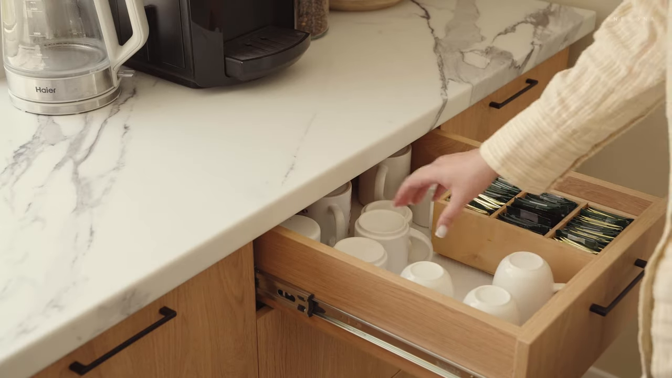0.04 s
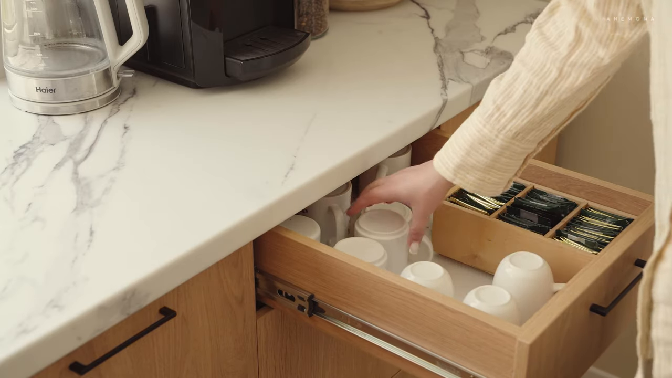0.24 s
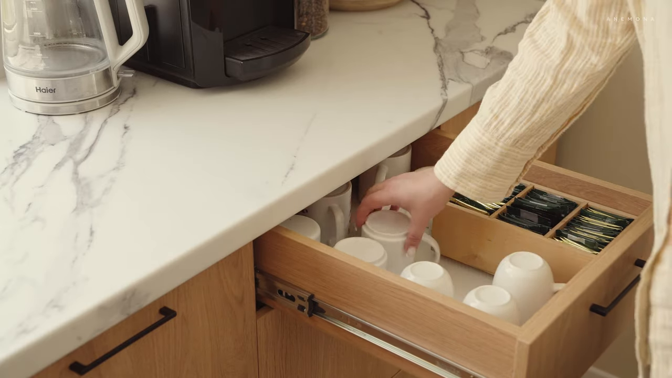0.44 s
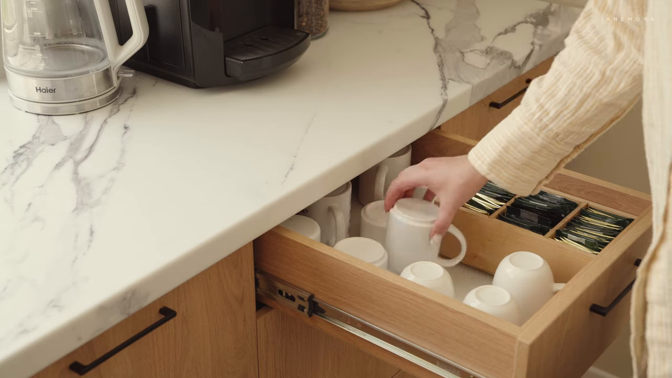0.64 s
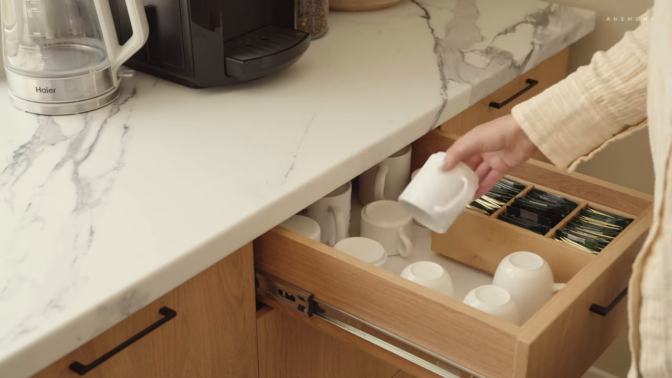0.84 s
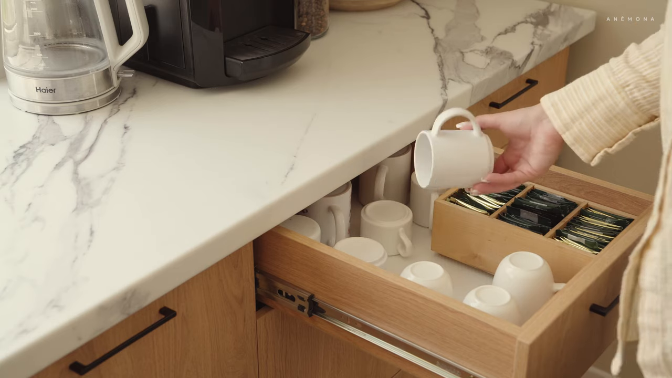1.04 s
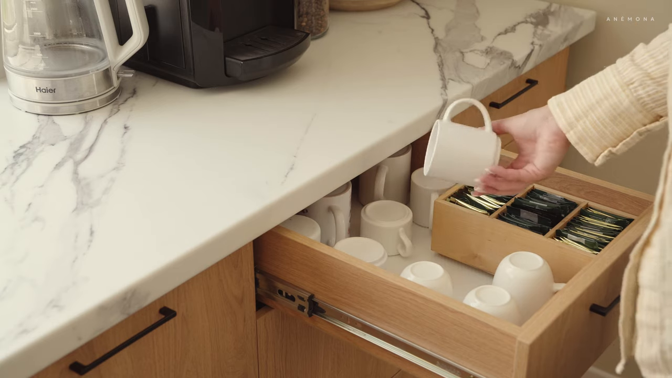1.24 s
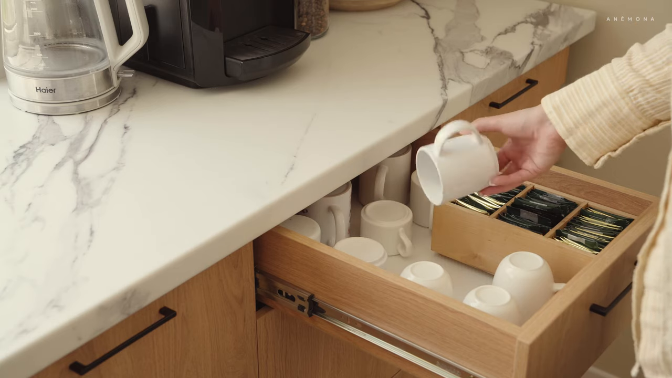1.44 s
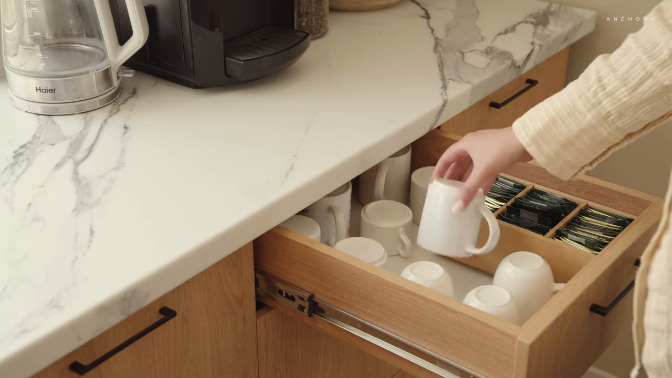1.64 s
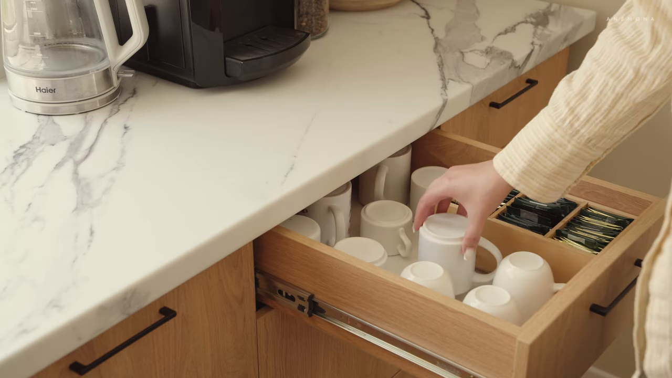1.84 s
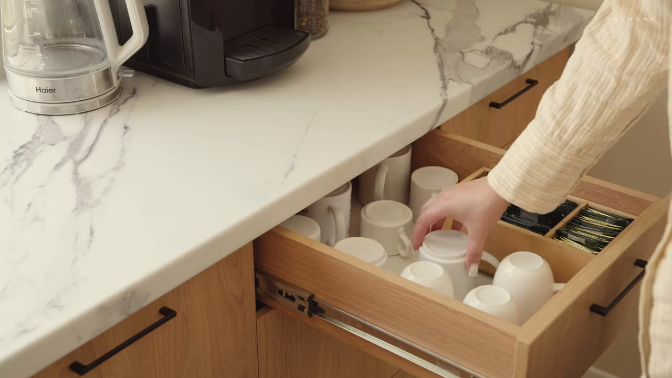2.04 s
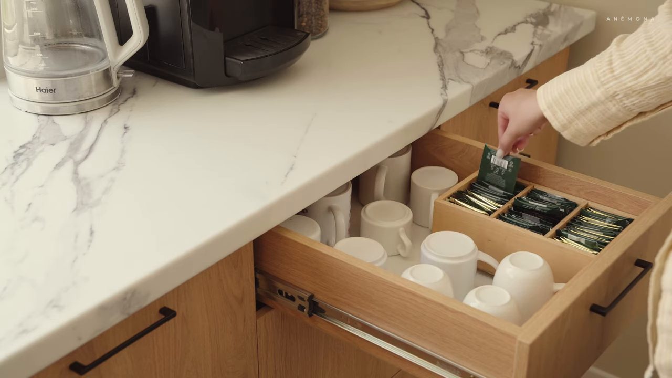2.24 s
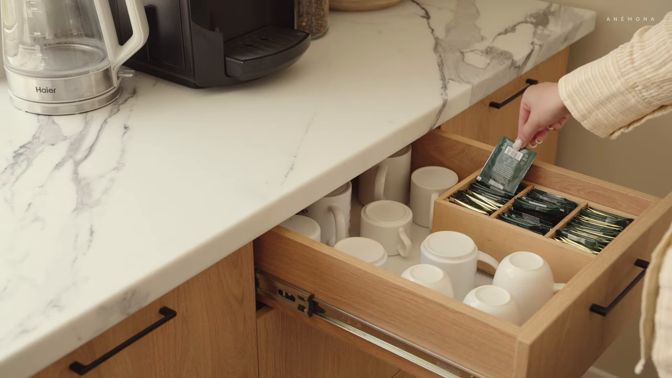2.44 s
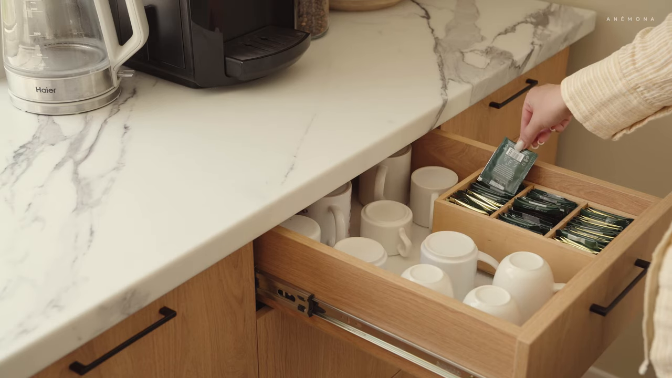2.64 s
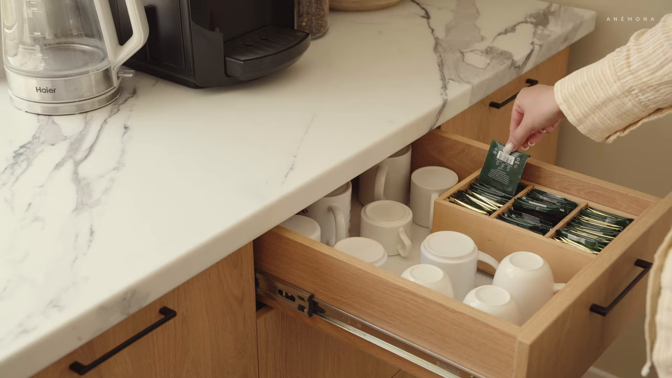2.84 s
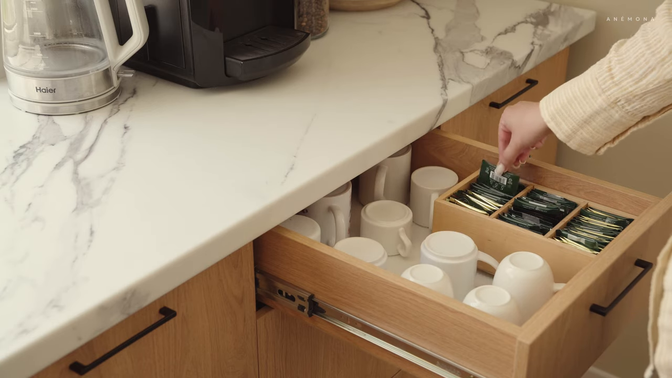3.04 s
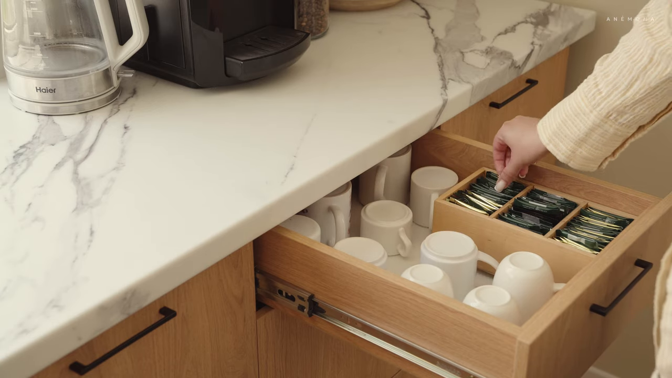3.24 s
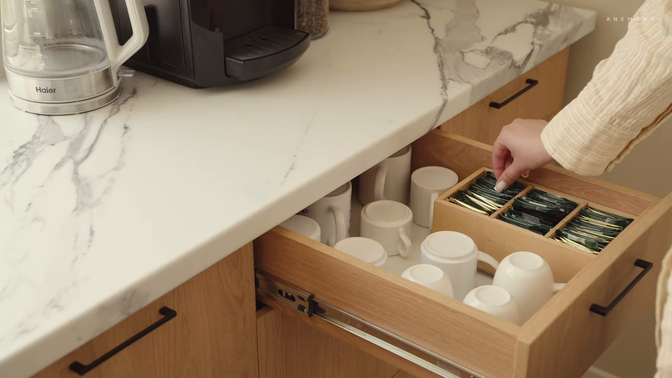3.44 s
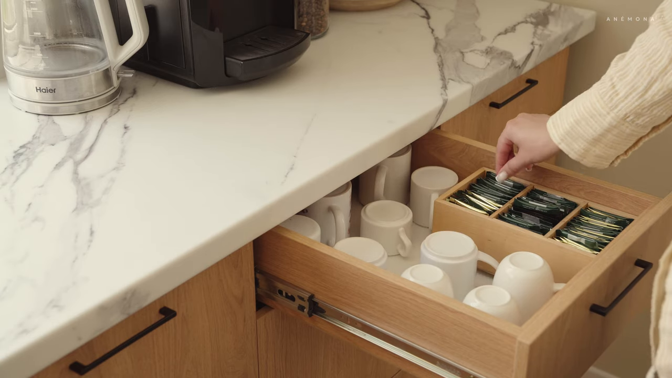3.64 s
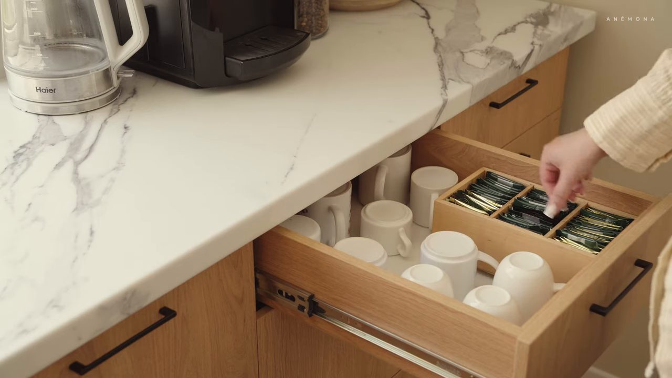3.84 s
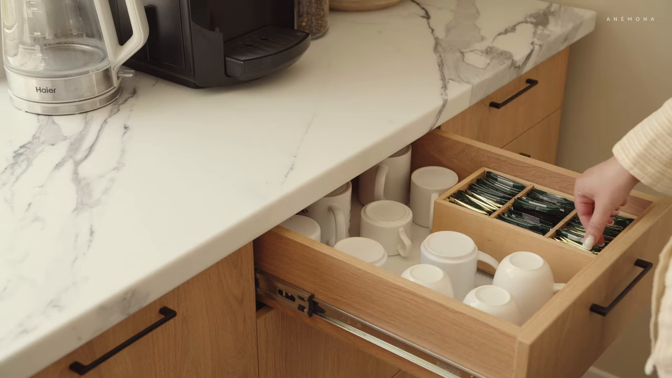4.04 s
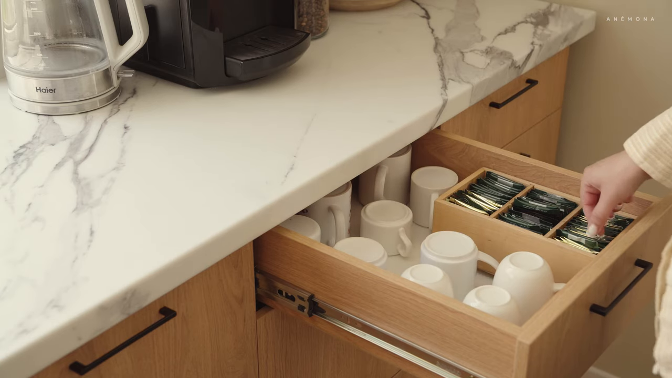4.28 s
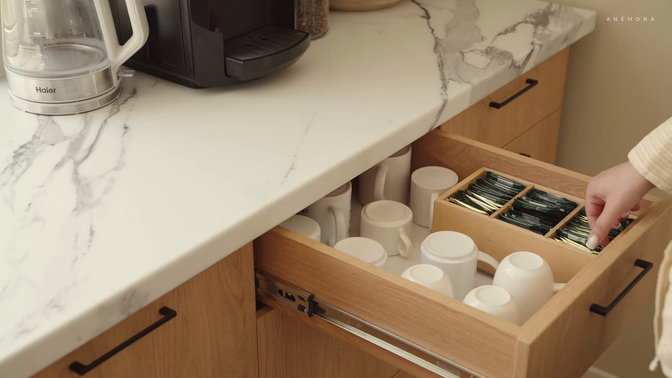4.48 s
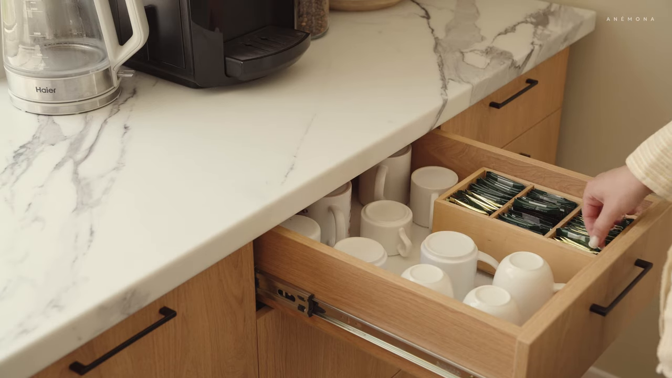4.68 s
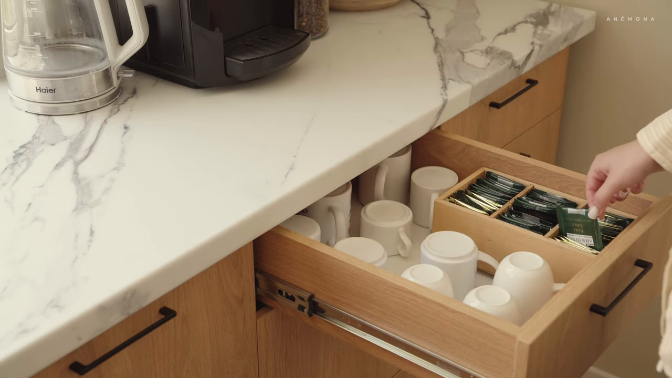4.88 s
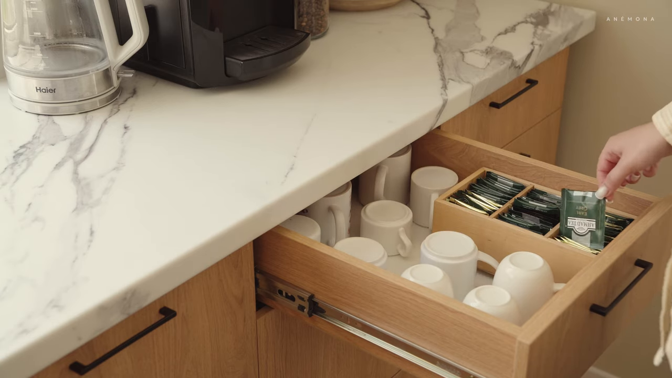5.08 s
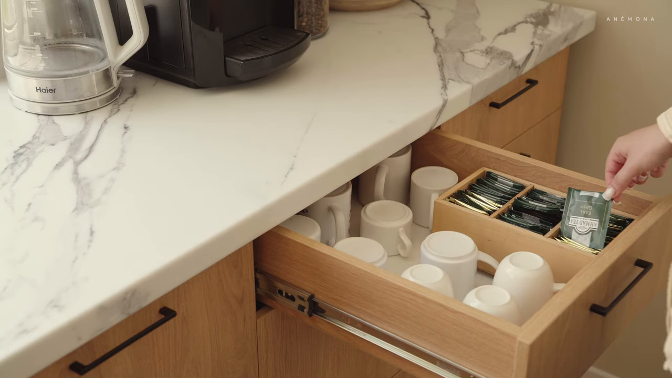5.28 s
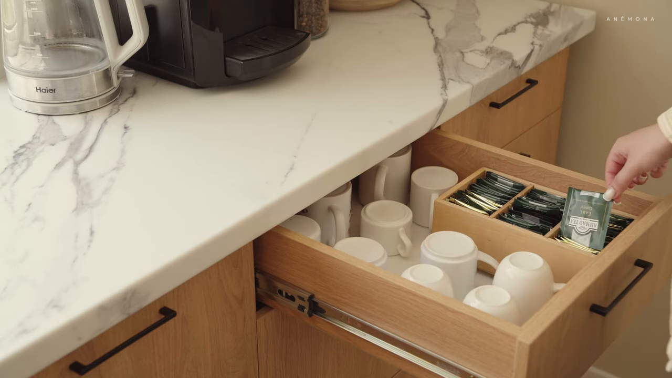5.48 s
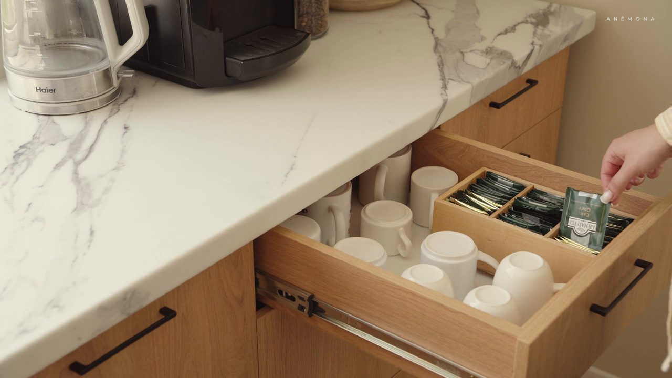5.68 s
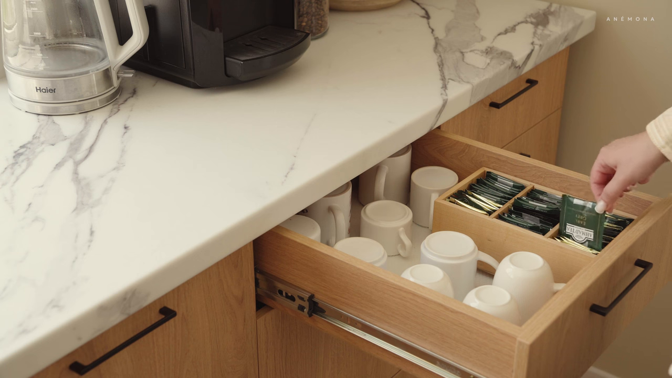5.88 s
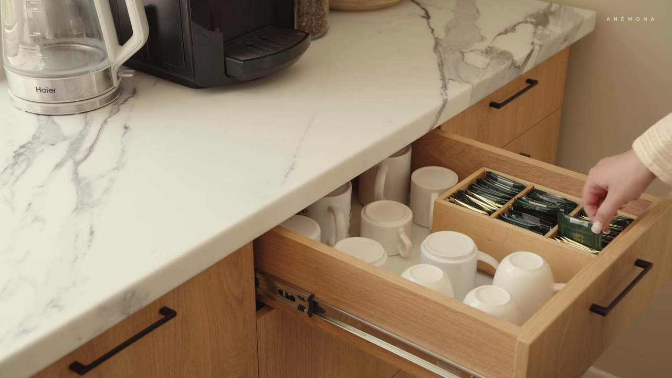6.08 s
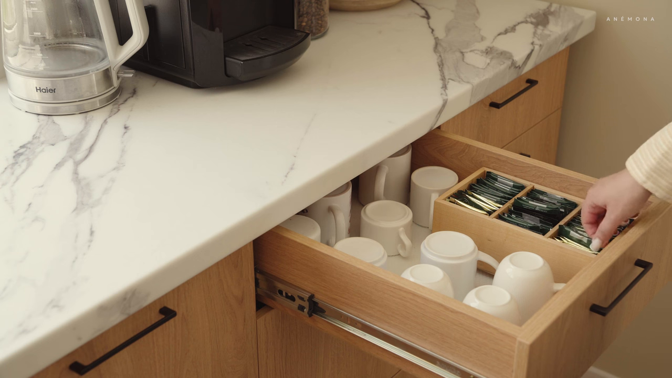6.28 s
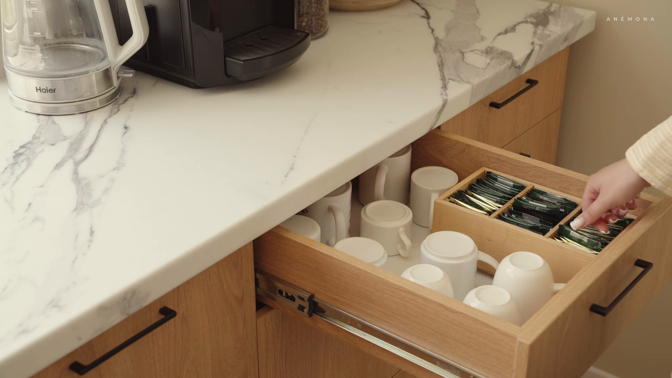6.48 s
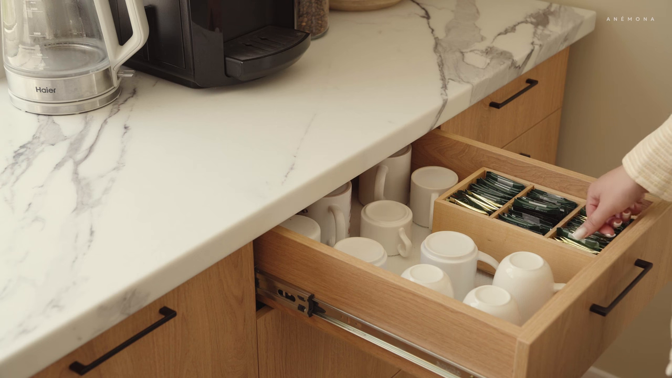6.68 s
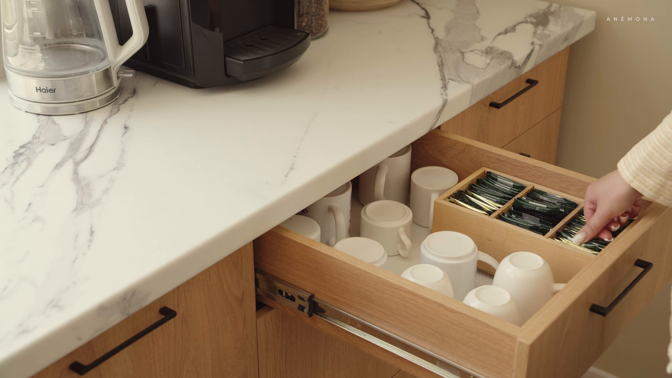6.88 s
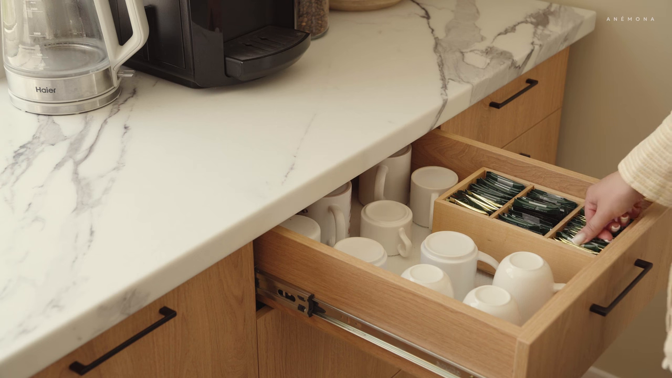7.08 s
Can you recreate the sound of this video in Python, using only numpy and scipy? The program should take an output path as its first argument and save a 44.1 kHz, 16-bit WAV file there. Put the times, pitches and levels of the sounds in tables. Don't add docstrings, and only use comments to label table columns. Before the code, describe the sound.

Quiet kitchen air with a low hum, heard close in stereo beside an open wooden drawer. Around 0.55 s a ceramic cup drags loose with a short scrape and a dull thump; a barely audible brush follows near 0.9. At 1.87 bright ceramic clinks ring out with rapid rebounds, a short clatter and soft wooden thuds. From 2.18 to 2.26 several quick dull knocks settle the cup, then the ring is cut short. At 2.35 a foil tea sachet snaps and rustles; crisp snaps and a steady slide run from 2.8 to 3.4, with a slight hollow ring, fading by 3.7. Faint shifts come at 4.2 and 4.6. A dense crumpling burst fills 4.8 to 5.2, then a light tick and soft gliding hiss near 5.9. At 6.05 another snap and firm rustle lead to a faint low box groan at 6.4, a dull snap, and small settling crackles near 6.9.

```python
import sys
import numpy as np
from scipy import signal
from scipy.fft import rfft, irfft
from scipy.io import wavfile
from scipy.ndimage import uniform_filter1d

SR = 44100
rng = np.random.default_rng(int(sys.argv[2]) if len(sys.argv) > 2 else 0)


def invert_db(level):
    return 10 ** (np.asarray(level, dtype=float) / 20)


def log_audio(samples):
    frames = np.atleast_2d(samples).T
    limited = np.clip(frames, -1, 1)
    pcm = np.round(limited * 32767).astype(np.int16)
    wavfile.write(sys.argv[1], SR, pcm)


N = 313627
TIME = np.arange(N) / SR
CHANGE_S = 2.267

# (frequency [Hz], density [dB per Hz])
AIR_COLOUR = [(15, -12), (30, -9), (60, -12), (110, -12), (200, -7), (400, -14), (800, -19), (1600, -24),
              (3200, -27.5), (6400, -31), (12000, -35), (16000, -38)]
AIR_DB = -53.5
# (frequency [Hz], width [Hz], lift [dB])
ROOM_HUMS = [(116, 7.5, 1), (205, 9.9, 18), (259, 8.1, 3.9), (367.34, 4.6, 10.6), (450, 14, 4.4),
             (672, 9.6, 10.8)]
# (frequency [Hz], likeness [0-1])
CAPSULE_LIKENESS = [(30, 0.96), (200, 0.87), (550, 0.26), (1650, 0.08), (5000, 0.05), (15000, 0.082)]

CUP_MODES_HZ = [1620, 1845, 1949, 2138, 2159, 2248, 2374, 2555, 2643, 2692, 2805, 3705, 4506, 4791, 5909,
                5931, 6347, 6955, 7160, 7634, 9905, 10290, 10390, 11030, 11370, 11980, 12390, 12570, 13060,
                15350]
# (level [dB], t60 [s])
CUP_MODE_RING = [(-18, 0.14), (-17, 0.24), (-32, 0.21), (-15, 0.65), (-6, 0.29), (-7.5, 0.28), (-30, .3),
                 (-2, 0.61), (-10, 0.12), (-28, 0.36), (-20, 0.49), (-47, .3), (-24.5, 0.37), (-20.5, 0.19),
                 (-10.5, 0.26), (-4, 0.14), (-36, 0.23), (-28, 0.4), (-20, 0.66), (-29, 0.76), (-21, 0.25),
                 (-23, 0.24), (-34, 0.2), (-30, .22), (-27, 0.31), (-30, 0.5), (-38, .2), (-25, 0.24),
                 (-16, 0.2), (-20, .25)]
# (time [s], level [dB], hardness as cut-off [Hz])
CLINKS = [
    (1.8721, -23.5, 11900),
    (1.8825, -33.5, 3920),
    (1.898, -30, 14000),
    (2.1848, -44.5, 2500),
]
# (frequency [Hz], density [dB per Hz])
CLATTER_COLOUR = [(100, -19), (300, -6.5), (600, -0.5), (850, -3), (1300, -6.5), (1700, -14.5), (2300, -4),
                  (2900, -19), (3400, -33), (5300, -33), (7300, -14.5), (8700, -50), (10000, -25),
                  (13300, -33), (14600, -45)]
CLATTER_DB, CLATTER_T60_S = 1.5, 0.15

# (frequency [Hz], level [dB], t60 [s])
DRAWER_MODES = [(136, -9.5, 0.26), (202.6, -4.5, 0.38), (278, 3.5, 0.12), (350, -4, 0.077),
                (412, -6.5, 0.062), (500, -0.5, 0.025), (580, -6.5, 0.11), (735, -9.5, 0.05),
                (970, -3.5, 0.021), (1220, -5.5, 0.034), (1520, -6, .02), (1900, -9, 0.021),
                (2830, -12, .06)]
# (time [s], level [dB], hardness as cut-off [Hz])
KNOCKS = [(.561, -36, 800), (.575, -31.5, 178), (1.874, -34.5, 910), (1.9, -37.5, 900), (1.925, -26.5, 170),
          (2.184, -25.5, 960), (2.199, -25, 706), (2.213, -37, 450), (2.228, -34, 600),
          (2.235, -27.5, 1040), (2.2425, -41, 500), (2.255, -44, 405)]
# (time at full force [s], hold [s], level [dB], rise [dB/s], fall [dB/s])
SCRAPES = [
    (.54, 0.0061, -34.5, 200, 118),
    (.93, .005, -56, 600, 694),
]

# (time [s], level [dB], treble against it [dB], panel ring [Hz])
SNAPS = [(2.3545, -27, -31, 3540), (2.538, -42.5, 2, 2790), (2.897, -32, 8.5, 2000), (2.975, -32, 4, 2090),
         (3.131, -34, 11, 3020), (3.189, -36, -5, 1600), (3.3237, -34, 10, 2430), (3.651, -47.5, -5, 9100),
         (3.68, -46, -8, 11100), (4.144, -50.5, -9, 2390), (4.6, -52.5, -9, 2100), (5.187, -39.5, 0, 4970),
         (5.193, -58, -13, 3000), (5.363, -48, -14, 3830), (6.046, -28, 8, 2840), (6.444, -36, -22, 2490)]
SNAP_WIDTH, SNAP_CRACKLE_S, HALVING_DB = 1.61, 0.0094, 19
# (time [s], level [dB], panel ring [Hz], crackle [s])
CRUMPLES = [(2.358, -28, 5900, 0.0062), (2.774, -51, 1500, .011), (2.93, -40, 3200, 0.024),
            (3.0, -45, 2060, .014), (3.386, -36, 1870, 0.0045), (3.535, -55, 4030, .0075),
            (3.64, -47.5, 2120, 0.019), (4.23, -66, 2000, 0.036), (4.654, -58, 1900, 0.012),
            (4.877, -41, 2080, 0.049), (4.917, -34.5, 2830, 0.016), (4.965, -32.5, 3770, 0.024),
            (4.987, -37, 3950, .008), (5.1275, -32, 1370, .016), (5.16, -58, 1800, .017),
            (6.266, -40.5, 2000, 0.021), (6.308, -46.5, 2330, 0.021), (6.38, -48, 2260, .0086),
            (6.87, -50, 3380, 0.029)]
# (time [s], level [dB], panel ring [Hz], crackle [s])
CRINKLES = [(3.15, -39, 5000, 0.0065), (3.388, -45.5, 5130, 0.012), (3.69, -60, 12500, 0.037),
            (4.18, -58, 3500, .008), (4.288, -54, 2500, 0.02), (4.7, -53, 7500, .006),
            (4.816, -35.5, 1780, 0.0067), (4.934, -32.5, 2830, 0.018), (5.039, -31, 3960, .011),
            (6.051, -37.5, 2570, 0.018), (6.197, -39, 2830, 0.0094), (6.96, -49, 2920, .02)]
# (time [s], level [dB], panel ring [Hz], crackle [s])
BOX_TAPS = [
    (2.356, -36.5, 790, 0.027),
    (5.041, -36, 580, 0.013),
    (6.88, -46, 617, 0.02),
]
# (treble [dB], ring width [Hz])
SLACK_COLOUR = (-13, 1700)
# (treble [dB], ring width [Hz])
TAUT_COLOUR = (-1, 3400)
# (treble [dB], ring width [Hz])
WOODEN_COLOUR = (-28, 700)

# (time at full force [s], hold [s], level [dB], rise [dB/s], fall [dB/s])
STROKES = [
    (2.39, 0.012, -41.5, 58, 131),
    (3.05, 0.28, -48.5, 43, 102),
    (3.57, 0.096, -54.5, 90, 240),
    (4.2, 0.052, -58, 102, 57),
    (4.65, 0.075, -64, 104, 45),
    (4.88, 0.18, -42.5, 120, 72),
    (6.04, 0.18, -45.5, 71, 56),
    (6.95, .2, -58, 25, 30),
]
# (frequency [Hz], width [Hz], level [dB])
BOX_MODES = [(527, 130, 5), (630, 58, 5), (860, 720, 1.5), (1995, 170, -6)]
FIZZ_DB, FIZZ_FOLLOWS, BOOM_DB, BOOM_FOLLOWS, FOIL_HZ = -21, .7, 0, 0.79, 2300
# (time at full force [s], hold [s], level [dB], rise [dB/s], fall [dB/s])
GLIDES = [
    (2.28, .06, -60, 900, 100),
    (5.87, .17, -56, 90, 150),
    (6.46, 0.021, -62, 900, 120),
]
GLIDE_HZ, GLIDE_WIDTH_HZ = 4050, 3700
# (from [s], to [s])
HOLLOW_OPEN = (2.85, 3.55)
HOLLOW_HZ, HOLLOW_WIDTH_HZ, HOLLOW_DB = 2020, 150, 1
# (time at full force [s], hold [s], level [dB], rise [dB/s], fall [dB/s])
PUSH = [
    (6.37, 0.073, -49, 200, 500),
]
GROAN_HZ = 273

# (frequency [Hz], t60 [s])
KITCHEN_DECAY = [(150, 0.077), (600, 1), (2000, 0.92), (6000, 0.59), (14000, 0.27)]
# (delay [s], left level [dB], right level [dB])
FIRST_ECHOES = [(.0021, -15, -23), (.0046, -14, -16), (.0058, -15, -17), (.0074, -15, -5), (0.0099, 7, -25),
                (0.016, -21, -19)]
TURN_S = .23


def evened(x):
    return x / np.sqrt(np.mean(x ** 2) + 1e-20)


def read(points, hz):
    f, value = np.transpose(points)
    return np.interp(np.log(hz + 1), np.log(f + 1), value)


def add(mix, s, sound):
    part = mix[round(s * SR):][:len(sound)]
    part += sound[:len(part)]


def filtered(x, hz, kind, order=2):
    sos = signal.butter(order, np.clip(hz, 20, .45 * SR), kind, fs=SR, output="sos")
    return signal.sosfilt(sos, x)


def resonate(x, hz, width):
    return signal.lfilter(*signal.iirpeak(hz, hz / width, SR), x)


def ring(modes, seconds):
    t = np.arange(round(seconds * SR)) / SR
    total = 0
    for k, (hz, db, t60) in enumerate(modes):
        total = total + (-1) ** k * invert_db(db - 60 * t / t60) * np.sin(2 * np.pi * hz * t)
    return total


def blows(rows):
    force, click = np.zeros(N), signal.unit_impulse(2048)
    for s, db, hardness_hz in rows:
        add(force, s, invert_db(db) * filtered(click, hardness_hz, "low", order=3))
    return force


def effort_db(rows):
    s, hold, db, rise, fall = np.transpose(rows)[:, :, None]
    each_db = db - rise * np.maximum(s - TIME, 0) - fall * np.maximum(TIME - s - hold, 0)
    return 20 * np.log10(invert_db(np.maximum(each_db, -200)).sum(0))


def room_tone():
    frames, hz = N // 512 + 5, np.fft.rfftfreq(2048, 1 / SR)
    a, b, c, d = rng.standard_normal((frames, 1025, 4)).T
    swell = evened(uniform_filter1d(rng.standard_normal(frames), size=20))
    level_db = read(AIR_COLOUR, hz)
    for mode_hz, width, db in ROOM_HUMS:
        level_db = level_db + db / (1 + (2 * (hz - mode_hz) / width) ** 2)
    same = np.clip(read(CAPSULE_LIKENESS, hz), 0, 1)[:, None]
    mid = a + 1j * b
    side = np.sqrt((1 - same) / (1 + same)) * (c + 1j * d)
    z = np.array([mid + side, mid - side]) * np.sqrt(1 + same)
    z = z * invert_db(level_db[:, None] + 0.58 * swell)
    air = signal.istft(z, nperseg=2048, noverlap=1536)[1][:, :N]
    return invert_db(AIR_DB) * evened(air)


def drawer():
    grip = evened(filtered(rng.standard_normal(N), 600, "low", order=1))
    force = blows(KNOCKS) + grip * invert_db(effort_db(SCRAPES) - 45.5)
    return signal.fftconvolve(force, ring(DRAWER_MODES, .5))[:N]


def kitchen(x, echo_db, wet_db, alike):
    taps = np.zeros((2, SR))
    slots = np.arange(300, SR - 20, 20)
    at = slots + rng.integers(0, 20, (2, len(slots)))
    np.put_along_axis(taps, at, rng.choice([-1., 1.], at.shape), 1)
    hz, t, z = signal.stft(taps, SR, nperseg=256)
    decay = invert_db(-60 * t / read(KITCHEN_DECAY, hz)[:, None])
    tail = signal.istft(z * decay, SR, nperseg=256)[1]
    tail = tail + alike * tail[::-1]
    answer = invert_db(wet_db) * tail / np.linalg.norm(tail[0])
    answer[:, 0] += 1
    scatter = rng.standard_normal((2, 400)) * np.exp(-np.arange(400) / 66.0)
    answer[:, :400] += invert_db(-20.5) * filtered(scatter, 6000, "high")
    for s, left_db, right_db in FIRST_ECHOES:
        answer[:, round(s * SR)] -= invert_db(np.array([left_db, right_db]) + echo_db)
    mid = answer.mean(0)
    answer = mid + 2.24 * filtered(answer - mid, 990, "high", order=1)
    return signal.fftconvolve(x[None], answer, axes=1)[:, :N]


def cups():
    colour = invert_db(read(CLATTER_COLOUR, np.fft.rfftfreq(N, 1 / SR)))
    clatter = evened(irfft(rfft(rng.standard_normal(N)) * colour, N))
    shaking = np.zeros(N)
    for s, db, _ in CLINKS:
        after_s = TIME - s
        shaking += invert_db(db - 60 * abs(after_s) / CLATTER_T60_S) * (after_s > 0)
    modes = np.column_stack([CUP_MODES_HZ, CUP_MODE_RING])
    twins = modes[11:] * [1, 1, .8] - [0, 3.0, 0]
    twins[:, 0] *= 1 + 0.0081 * rng.uniform(-1.05, 1, len(twins))
    rung = signal.fftconvolve(blows(CLINKS), ring(modes, 1) + ring(twins, 1))[:N]
    return rung + invert_db(CLATTER_DB) * shaking * clatter


def glide():
    hiss = resonate(rng.standard_normal(N), GLIDE_HZ, GLIDE_WIDTH_HZ)
    hiss = resonate(hiss, GLIDE_HZ, 2 * GLIDE_WIDTH_HZ)
    return evened(hiss) * invert_db(effort_db(GLIDES)) * (TIME > CHANGE_S)


def creases(rows, click, rise_s):
    out, t = np.zeros(N), np.arange(6000) / SR
    luck = rng.random((len(rows), 2, len(t)))
    for (s, db, treble_db, hz, width, length), (when, size) in zip(rows, luck):
        clicks = (when < .3) * (size - .5) ** 3 * 6
        clicks = clicks * (1 - np.exp(-t / rise_s)) * np.exp(-t / max(length, .001))
        clicks[0] += click
        panel = resonate(resonate(clicks, hz, width), hz, 1.18 * width) * np.sqrt(SR / width)
        fizz = filtered(filtered(clicks, 4600, "high"), 5300, "low") * 1.05
        add(out, s, invert_db(db + 14) * (panel + invert_db(treble_db) * fizz))
    return out


def snaps():
    rows = []
    for s, db, treble_db, hz in SNAPS:
        crackle_s = SNAP_CRACKLE_S * 2 ** (-(db + 35.5) / HALVING_DB)
        rows.append((s, db, treble_db, hz, SNAP_WIDTH * hz, crackle_s))
    return creases(rows, click=.8, rise_s=.003)


def shifting_kitchen(x, count):
    total = 0
    for k in range(count):
        turn = (1 + np.cos(2 * np.pi * (TIME / (count * TURN_S) - k / count))) / count
        total = total + kitchen(x * turn, echo_db=-17.0, wet_db=-3.5, alike=0.5)
    return total


def crumples():
    rows = []
    for table, colour in [(CRUMPLES, SLACK_COLOUR), (CRINKLES, TAUT_COLOUR), (BOX_TAPS, WOODEN_COLOUR)]:
        treble_db, width = colour
        rows += [(s, db, treble_db, hz, width, length) for s, db, hz, length in table]
    return creases(rows, click=.15, rise_s=.002)


def rustle():
    slips = rng.standard_normal((3, N)) * invert_db(2.0 * rng.exponential(1, (3, N)))
    slips = slips * (rng.random((3, N)) < .3)
    clumps = evened(uniform_filter1d(rng.standard_normal(N), size=400))
    slips = slips * invert_db(2.2 * clumps)
    fizz = evened(filtered(filtered(slips[1], 4800, "high"), 9500, "low"))
    box = evened(sum(invert_db(db) * resonate(slips[2], hz, width) for hz, width, db in BOX_MODES))
    turn = np.exp(2j * np.pi * FOIL_HZ * TIME)
    foil = evened((turn * filtered(slips[0] / turn, 2270, "low", order=1)).real)
    over_db = effort_db(STROKES) + 50
    loud = np.maximum(over_db, -20)
    weak = np.minimum(over_db + 20, 0)
    layers = invert_db(loud) * foil
    layers = layers + invert_db(FIZZ_DB + FIZZ_FOLLOWS * loud) * fizz
    layers = layers + invert_db(BOOM_DB + BOOM_FOLLOWS * loud) * box
    return (TIME > CHANGE_S) * invert_db(weak - 56.0) * layers


def hollow(foil):
    is_open = (TIME > HOLLOW_OPEN[0]) & (TIME < HOLLOW_OPEN[1])
    return foil + invert_db(HOLLOW_DB) * resonate(foil * is_open, HOLLOW_HZ, HOLLOW_WIDTH_HZ)


def groan():
    hum = resonate(resonate(rng.standard_normal(N), GROAN_HZ, 27), GROAN_HZ, 50)
    return evened(hum) * invert_db(effort_db(PUSH))


def scene():
    cups_shown = np.clip((CHANGE_S - TIME) / 0.003, 0, 1)
    crockery = filtered(cups() + drawer(), 100, "high", order=4)
    foil = filtered(hollow(snaps() + crumples() + rustle()), 245, "high")
    before = kitchen(crockery * cups_shown, echo_db=-20, wet_db=-5.5, alike=0.62) * cups_shown
    after = shifting_kitchen(foil + groan(), count=3)
    after = after + kitchen(glide(), echo_db=-17.0, wet_db=-6.0, alike=0.38)
    air = room_tone()
    rumble = filtered(air, 91, "low") * cups_shown
    return before + after + air + 0.41 * rumble


def low_pass(x):
    return signal.sosfilt(signal.butter(12, 16500, fs=SR, output="sos"), x)


def record(dry):
    power_db = 10 * np.log10(abs(uniform_filter1d((dry ** 2).mean(0), size=400)) + 1e-12)
    recovery_db = 4.9 * TIME
    held_db = np.maximum.accumulate(power_db + recovery_db) - recovery_db
    over_db = np.maximum(held_db + 21.5, 0) * (TIME < CHANGE_S)
    ducked = dry / invert_db(1.2 * uniform_filter1d(over_db, size=100))
    finished = filtered(ducked, 15950, "low", order=16)
    return low_pass(finished)


dry = scene()
out = record(dry)
log_audio(out)
```